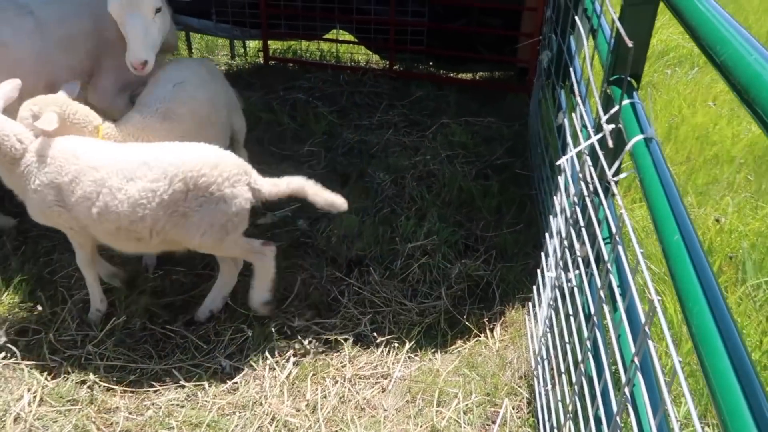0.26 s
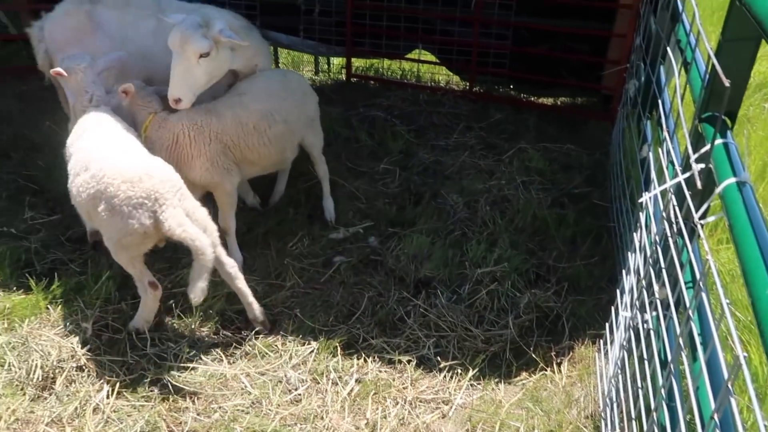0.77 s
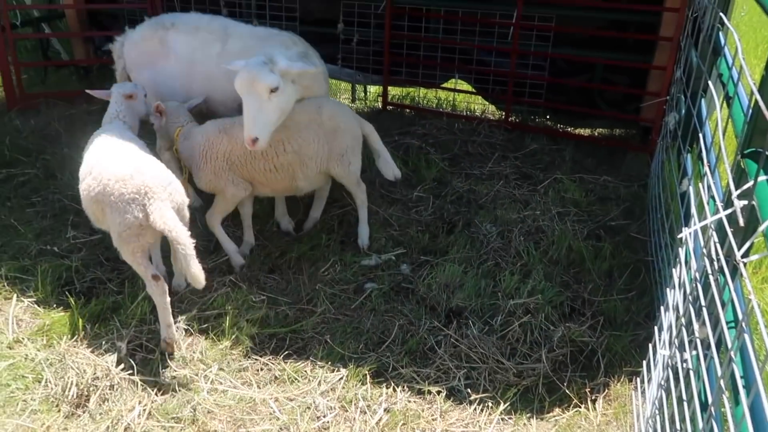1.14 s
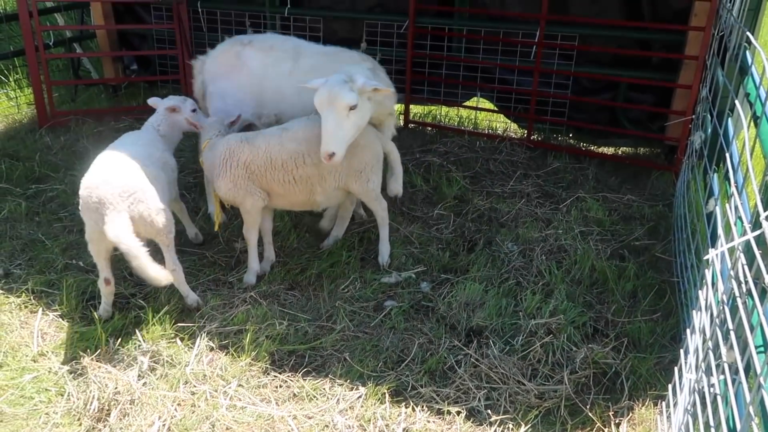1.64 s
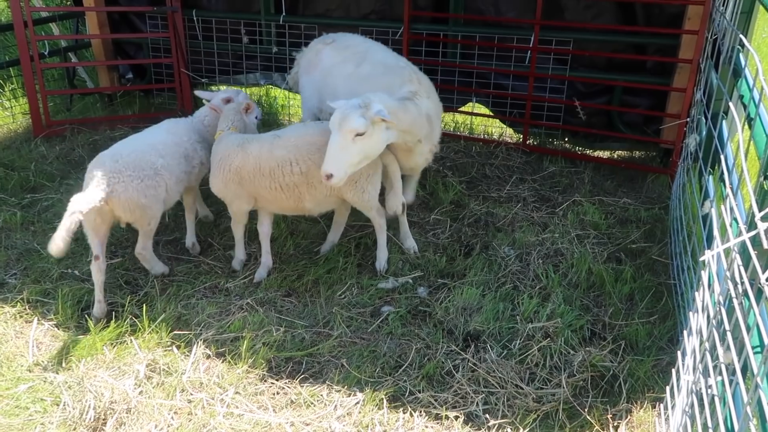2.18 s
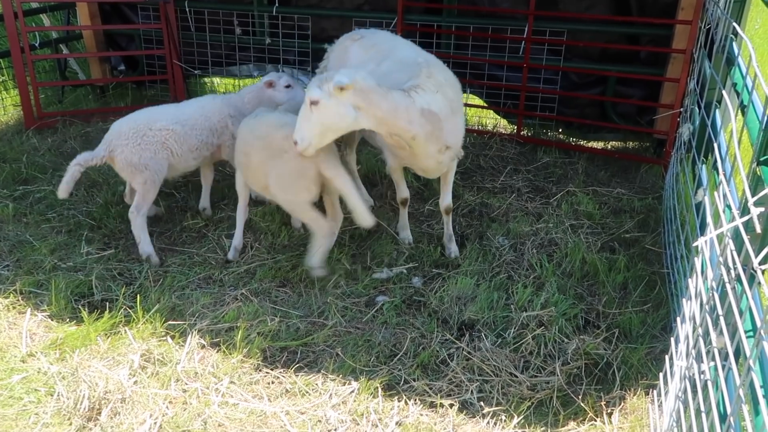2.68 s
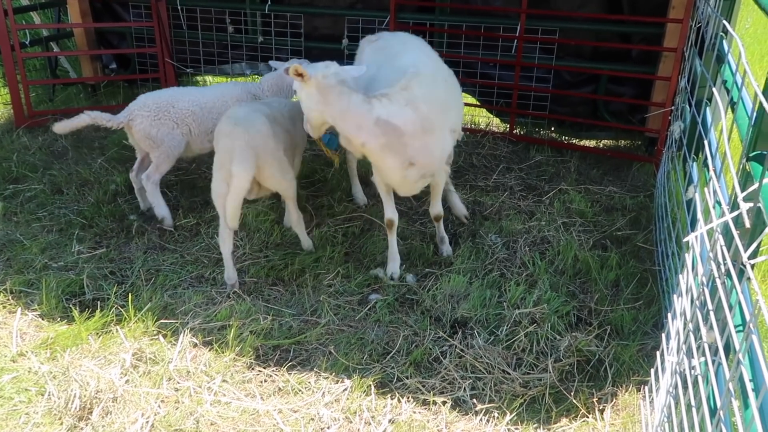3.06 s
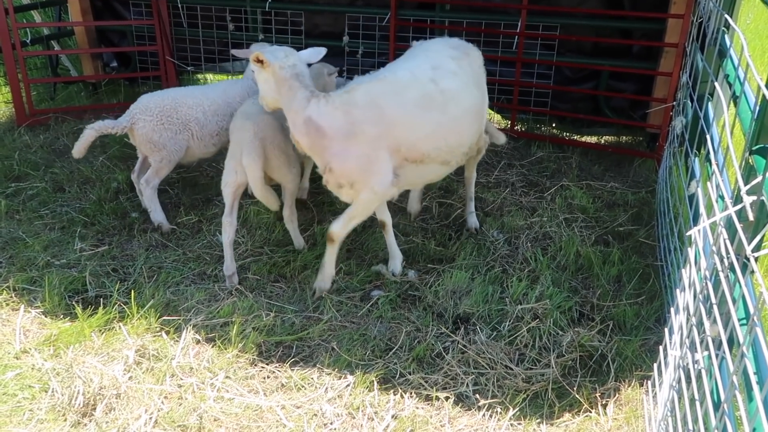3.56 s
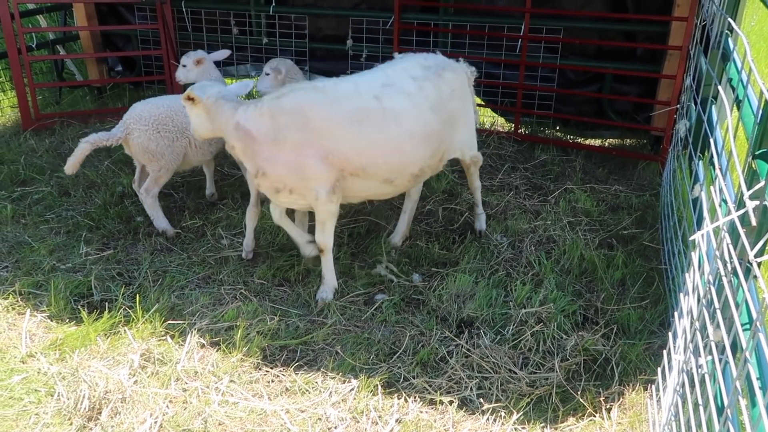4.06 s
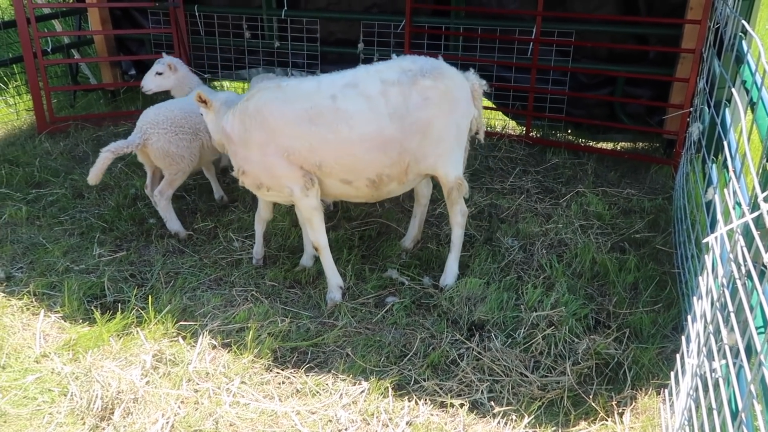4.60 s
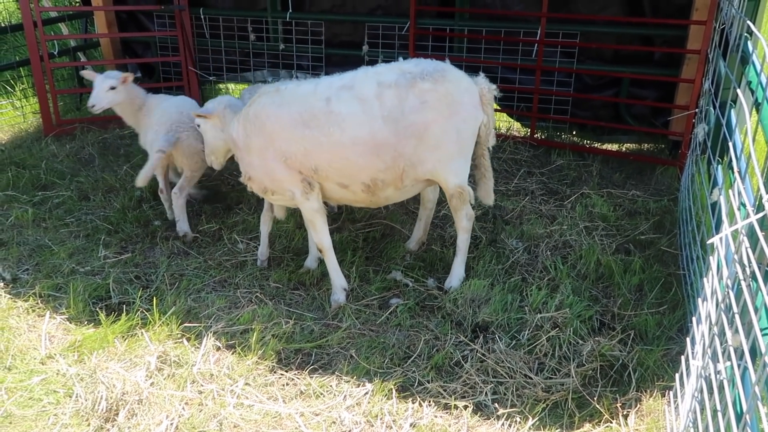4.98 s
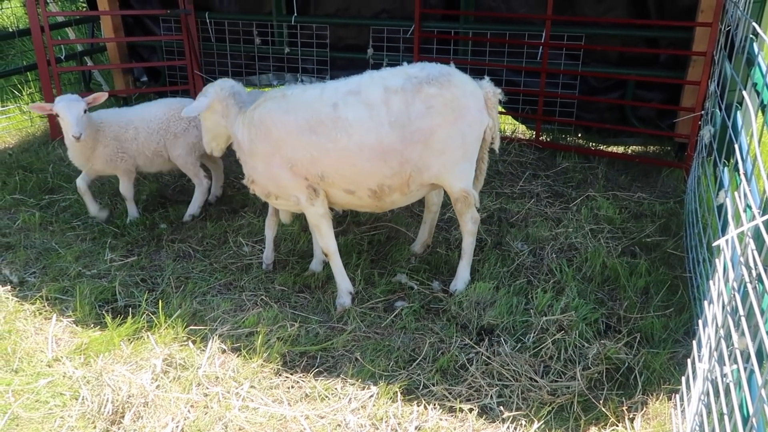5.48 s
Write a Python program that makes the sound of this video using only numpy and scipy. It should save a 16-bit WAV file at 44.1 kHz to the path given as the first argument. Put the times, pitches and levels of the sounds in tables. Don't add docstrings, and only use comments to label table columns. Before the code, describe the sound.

A quiet outdoor sheep pen, heard close in stereo, with soft air noise and a distant engine idling low. At 0 s tubes and mesh still ring faintly from an earlier blow. At about 0.4 s a loud, hard metallic clank comes with a second weaker one immediately after, each rattling, the ring fading over the next second. Straw rustles lightly; a bird whistles near 0.9 s and again around 1.8 s, where a dry stalk cracks. From 2.5 to 3.15 s a sheep bleats once: a brief closed hum, a loud open low onset, a rough break up to a higher, steadier pitch, and a harsh catch as it closes. The low background grows a little fuller around then. Muffled hoof thumps and scrapes fall at 3.9-4.15 s, followed by a rapid bird trill at 4.3-4.6 s. A sharp straw snap at 4.6 s, then bird chirps and crisp snaps from 5.15 to 5.5 s.

```python
import sys
import numpy as np
from scipy import signal
from scipy.fft import rfft, irfft, next_fast_len
from scipy.io import wavfile
from scipy.ndimage import uniform_filter1d

SR = 44100
rng = np.random.default_rng(int(sys.argv[2]) if len(sys.argv) > 2 else 0)


def rack_gain(trim_db):
    fader = np.asarray(trim_db, float)
    return 10 ** (fader / 20)


def waveform_to_disk(signal):
    frames = np.transpose(np.atleast_2d(signal))
    scaled = np.clip(frames, -1, 1) * 32767
    samples = np.round(scaled).astype(np.int16)
    wavfile.write(sys.argv[1], SR, samples)


N = 253134

# (time [s], effort [dB], pitch [Hz], mouth opening [0-1])
BLEAT = [
    (2.515, -17, 258.9, 0.26),
    (2.563, -30.5, 257, 0.24),
    (2.6, -20, 241.9, 0.95),
    (2.634, -12, 261.3, 0.95),
    (2.69, -14, 284, 0.98),
    (2.736, -18, 277.7, 1),
    (2.754, -19, 360.3, 0.86),
    (3.065, -19.5, 365.4, 1),
    (3.13, -17.5, 338, 0.81),
]
# (time [s], fall [s], recovery [s], pitch drop [Hz], extra roughness [0-1])
CATCHES = [
    (2.582, .02, .02, 22, .25),
    (2.747, .015, .03, 0, .45),
    (2.79, .024, .014, 70, .3),
    (2.818, .05, .024, 40, .1),
    (2.884, .035, .05, 20, .15),
    (2.902, .016, .024, 55, .25),
    (3.092, .02, .04, 50, .36),
]
# (time [s], length [s], level [dB])
SURGES = [(2.614, 0.023, 1.5), (2.654, 0.018, -2), (2.691, 0.012, 0), (2.722, 0.023, -1),
          (2.787, 0.012, -4), (2.804, 0.01, 2), (2.833, 0.013, -1.5), (2.892, 0.009, 2.5),
          (2.907, 0.017, -5.5), (2.921, 0.025, 3), (3.038, 0.038, -1), (3.069, .012, -2),
          (3.083, 0.017, 2.5), (3.1, 0.011, -4), (3.104, 0.0082, 0.5)]
# (time [s], level [dB])
BREATH_EBB = [(2.75, 1), (2.766, -5), (2.785, 1), (2.83, 1), (2.85, -5), (2.88, -4), (2.895, 0), (3.07, 0),
              (3.1, 2)]
# (time [s], shift [Hz])
TONGUE_SINKS = [
    (2.63, 70),
    (2.67, -25),
]
# (time [s], shift [Hz])
GAPE = [
    (2.66, 45),
    (2.7, 0),
]
# (frequency [Hz], width [Hz], level [dB])
THROAT = [(3120, 450, 1.5), (3785, 360, -13)]
# (frequency [Hz], width [Hz], level [dB])
BREATHY = [(4900, 1700, -22.5), (6110, 1500, -25), (7400, 980, -29), (11500, 12000, -53),
           (13900, 4100, -50)]
# (frequency [Hz], side over mid [dB])
VOICE_SIDE = [(60, -42), (150, -45), (380, -87), (950, -27.5), (2380, -20.5), (5980, -9.5), (15000, 5)]

# (time [s], peak [dB], rebound gap [s], loss per rebound [dB])
BLOWS = [
    (.38, -8.5, .0062, 2.8),
    (.4115, -13, .0048, 1.2),
]
# (frequency [Hz], level [dB], 60 dB decay time [s])
GATE_MODES = [(610, -14, 0.5), (1028, -1, 0.24), (1073, -12, 0.73), (1357, -8.5, 0.65), (1602, -6, 0.64),
              (1890, -24, 0.25), (2010, -18, 0.7), (2130, -13, 0.25), (2530, -13, 0.24), (2900, -19, 0.47),
              (3450, -15, 0.25), (4660, -7, 0.1), (4900, -10, 0.27), (5030, -18, 0.15), (5280, -18, 0.19),
              (5770, -13, 0.2), (7760, -16.5, 0.19)]
# (frequency [Hz], level [dB], 60 dB decay time [s])
GATE_RING = [(1553, -13, 1.6), (1578, -8, 0.68), (1550, -4, 0.6), (4050, -8.5, 0.37)]
# (frequency [Hz], level [dB], 60 dB decay time [s])
OLDER_MODES = [(353, -6, 2.9), (580, -2, 0.83), (920, -12, 4.1), (1027, -7, 3.8), (1330, -12, 0.47),
               (1450, 2, 0.75), (1540, -3, 1.3), (1572, -4, 3.6), (2120, -19, 0.85), (2540, -13.5, 1.3),
               (2830, -9, 0.21), (3110, -16, 2.8), (4080, -15, 0.94), (4500, -19, 0.87)]
# (frequency [Hz], density [dB per Hz])
MESH = [(250, -9.5), (600, -11), (1050, -3), (1550, 6.5), (2200, -4), (2900, -17), (4000, -13.5),
        (4900, -20), (6000, -22.5), (7900, -26.5), (10000, -46)]
# (frequency [Hz], density [dB per Hz])
OLDER_MESH = [(88, -44), (150, 3), (489, -4.5), (558, -12), (753, -5.5), (1540, 0.5), (2300, -12),
              (8000, -32.5), (10400, -65), (17600, -120)]
# (frequency [Hz], side over mid [dB])
GATE_SIDE = [(60, -28), (150, -35), (380, -57), (950, -20.5), (2380, -7), (5980, 2.5), (15000, 16)]

# (time [s], thump peak [dB], thump frequency [Hz], thump length [cycles], scrape [dB])
HOOVES = [(3.902, -46, 200, 0.55, -40), (3.912, -52, 200, 0.6, -41), (3.919, -45, 200, 1, -38),
          (3.935, -50, 200, 0.6, -42), (3.945, -50, 200, 0.6, -49), (3.981, -36, 159, 0.76, -34.5),
          (3.997, -34.5, 151, 0.96, -36), (4.054, -48, 161, 0.84, -37.5), (4.061, -33, 150, 0.52, -38),
          (4.069, -26, 153, 1, -37), (4.076, -35, 151, 1.6, -42), (4.083, -44, 150, 1.1, -41),
          (4.09, -36, 152, 0.68, -45), (4.145, -31, 196, 1.1, -35.5), (4.1516, -25.5, 144, 3.3, -57),
          (5.383, -36, 303, 0.56, -43)]
# (time [s], peak [dB], colour [Hz], left minus right [dB])
SNAPS = [
    (0.781, -48, 4500, 6),
    (0.9017, -44, 7250, -1),
    (4.577, -36, 7160, -1),
    (5.3675, -41, 5600, -2),
    (5.516, -41, 5090, 0),
         (2.197, -49, 2640, 0.5),
    (2.298, -43, 2100, -0.5),
    (3.7794, -59, 1810, 0.0),
    (4.1452, -36, 1900, 0.095),
    (4.467, -41, 4530, -0.54),
    (5.1497, -38, 2120, -1.0),
]
# (time [s], peak [dB], frequency [Hz], 60 dB decay time [s])
CLICKS = [
    (1.8069, -26, 2300, .007),
    (5.3672, -34, 5200, .005),
]
# (time [s], length [s], frequency [Hz], level [dB])
SHUFFLES = [
    (1.345, 0.15, 1800, -54.5),
    (1.351, 0.47, 850, -54),
    (1.547, 0.17, 1850, -52.5),
    (2.053, 0.12, 1210, -60),
    (4.558, 0.41, 1450, -58.5),
    (5.34, 0.11, 625, -50),
]
# (time [s], length [s], level [dB])
SWISHES = [(0.163, 0.051, -61), (0.248, 0.16, -57.5), (0.513, 0.12, -52.5), (0.903, 0.057, -55.5),
           (1.282, 0.075, -61), (1.71, 0.06, -62), (1.993, 0.084, -65), (2.227, .06, -68),
           (2.387, 0.08, -95), (3.416, 0.04, -61.5), (3.647, 0.21, -65.5), (3.998, 0.21, -61),
           (4.398, 0.16, -58.5), (4.54, 0.12, -60), (5.187, 0.055, -68), (5.502, 0.029, -55.5),
           (5.686, 0.035, -65)]
# (time [s], level [dB])
STIR = [(0, -60.5), (.72, -66), (1.05, -61), (1.44, -64), (2.3, -64.5), (2.9, -57), (3.5, -71),
        (4.3, -66.5), (4.85, -74.5), (5.28, -64), (5.74, -70)]
# (frequency [Hz], density [dB per Hz])
STRAW = [(600, -25.5), (1500, -10), (3000, 3), (6000, -2), (9000, -4.5), (12500, -4), (15500, -11)]

# (start [s], length [s], first pitch [Hz], last pitch [Hz], level [dB])
WHISTLES = [
    (.87, 0.16, 2420, 2540, -50.5),
    (1.012, 0.073, 2480, 2600, -59),
    (1.01, 0.09, 3630, 3280, -59),
    (1.754, 0.055, 3450, 2460, -53.5),
    (3.604, 0.035, 5680, 5540, -58),
    (3.967, 0.1, 4900, 4410, -59),
    (4.046, 0.064, 4190, 2980, -53),
    (4.28, 0.052, 2840, 2880, -55),
    (5.301, 0.026, 2427, 2700, -54.5),
    (5.327, 0.052, 2720, 2660, -52.5),
]
# (start [s], length [s], first pitch [Hz], last pitch [Hz], level [dB])
GLIDES = [
    (1.093, .12, 3300, 3390, -64),
    (1.862, 0.044, 2490, 3300, -55),
    (1.898, .028, 3350, 3200, -52),
    (1.926, 0.0355, 2770, 2440, -55),
    (5.226, 0.041, 2540, 4100, -54),
    (5.264, 0.013, 3550, 3370, -51),
    (5.368, .025, 2690, 2480, -55),
    (5.398, .045, 2620, 2680, -61),
    (5.449, .07, 3450, 2110, -54),
]
# (start [s], length [s], first pitch [Hz], top pitch [Hz], last pitch [Hz])
ARCHES = [
    (4.173, 0.12, 2200, 3690, 2820),
]
# (time [s], pitch [Hz], level [dB])
TRILL = [
    (4.295, 4500, -52),
    (4.33, 4510, -48),
    (4.47, 4620, -55),
    (4.499, 4490, -50.5),
    (4.635, 4410, -59),
]
# (frequency [Hz], side over mid [dB])
BIRD_SIDE = [(2000, -10), (5000, -1)]

# (multiple of the firing cycle, level [dB])
ENGINE_ORDERS = [(1, -39.5), (2, -16), (3, 1.5), (4, 1.5), (5, -4), (6, -11.5), (7, -10), (8, -8),
                 (9, -19.5), (10, -17), (11, -19), (12, -11), (13, -16.5), (14, -24)]
# (frequency [Hz], density [dB per Hz])
AIR = [(20, -36), (45, -36), (70, -16), (200, -13.5), (300, -11.5), (520, -15.5), (750, -16), (2800, -26.5),
       (4300, -33.5), (5500, -32.5), (10500, -50.5), (15500, -82)]
# (frequency [Hz], density [dB per Hz])
AIR_SIDE = [(59, -78), (100, -49), (223, -15.5), (457, -9.5), (519, -8), (5630, -15.5), (9950, -24.5),
            (12000, -20), (13900, -22), (15500, -56)]
# (start [s], end [s], frequency [Hz], pulse rate [per s], level [dB])
RATTLES = [
    (0.554, 2, 4000, 23, -65.5),
    (3.199, 4.604, 5680, 44, -76),
    (5.046, 5.2, 5670, 40, -70),
]

# (frequency [Hz], gain [dB])
WIND_BASS = [(110, 0), (296, -4), (800, -30)]
# (time [s], step [dB])
WIND_STEPS = [
    (2.22, 3.4),
    (2.72, 4.1),
]
# (frequency [Hz], gain [dB])
BAND_LIMITS = [(25, -17), (65, -1.0), (15560, 0.5), (15720, -75)]

CLEAR_START_S, CLEAR_END_S, CLEAR_EDGE_S = 2.94, 3.07, 0.013


def evened(x):
    return x / np.sqrt(np.mean(x ** 2) + 1e-20)


def follow(rows, t):
    return np.interp(t, *np.transpose(rows))


def read(points, hz):
    f, value = np.transpose(points)
    return np.interp(np.log(hz + 1), np.log(f + 1), value)


def add(mix, s, sound):
    part = mix[..., round(s * SR):][..., :sound.shape[-1]]
    part += sound[..., :part.shape[-1]]


def wander(size, width):
    return evened(uniform_filter1d(uniform_filter1d(rng.standard_normal(size), width), width))


def sine(hz):
    return np.sqrt(2) * np.sin(2 * np.pi * np.cumsum(hz) / SR)


def resonate(x, hz, width):
    turn = np.exp(2j * np.pi * np.cumsum(hz * np.ones(len(x))) / SR)
    r = np.exp(-np.pi * width / SR)
    return 2 * (turn * signal.lfilter([(1 - r) ** 2], [1, -2 * r, r * r], x / turn)).real


def coloured(x, points, turn=1):
    size = next_fast_len(x.shape[-1] + 4096)
    gain = rack_gain(read(points, np.fft.rfftfreq(size, 1 / SR)))
    return irfft(rfft(x, size) * turn * gain, size)[..., :x.shape[-1]]


def ports(x, side):
    s = coloured(x, side, -1j)
    return np.array([x + s, x - s])


def hiss(points):
    a, b, patches = rng.standard_normal((N // 256 + 5, 513, 3)).T
    for axis in (0, 1):
        patches = uniform_filter1d(patches, size=12, axis=axis)
    level_db = read(points, np.fft.rfftfreq(1024, 1 / SR))[:, None] + 2 * evened(patches)
    z = (a + 1j * b) * rack_gain(level_db)
    return evened(signal.istft(z, nperseg=1024, noverlap=768)[1][:N])


def shed(x, t60):
    taps = np.zeros((2, SR // 2))
    slots = np.arange(0, SR // 2 - 30, 30)
    places = slots + rng.integers(0, 30, (2, len(slots)))
    np.put_along_axis(taps, places, rng.choice([-1., 1.], places.shape), 1)
    t = np.arange(SR // 2) / SR
    taps = (taps + .8 * taps[::-1]) * rack_gain(-60 * t / t60) * (t > 0.00073)
    return signal.fftconvolve(x[None], taps / np.linalg.norm(taps[0]), axes=1)[:, :N]


def articulation(t, clear):
    s, *columns = np.transpose(BLEAT)
    effort_db, hz, wide = (np.interp(t, s, c) for c in columns)
    onset_s, edge_db_per_s = 0.03, 779
    outside_s = np.maximum(t - s[-1], 0) + np.maximum(s[0] + onset_s - t, 0)
    effort_db = effort_db - edge_db_per_s * outside_s

    lips = np.interp(wide, [0, .32, .42, .8, 1], [0, 0, .8, .8, 1])
    mouth = np.interp(lips, [0, 1], [275, 898]) - 36 * clear
    tongue = np.interp(wide, [0, 1], [2350, 2185]) - 9 * clear
    bright_db = np.interp(wide, [0, 1], [-20, 1]) + 4.5 * clear
    tongue = tongue + wide * follow(TONGUE_SINKS, t)
    mouth = mouth + lips * follow(GAPE, t)
    mouth = mouth - 69 * clear * (t > 3) * np.minimum((t - 3) / CLEAR_EDGE_S, 1)

    rough_shut, rough_low, rough_high, rough_clear = .12, .33, .28, .11
    rough = rough_shut + wide * (np.interp(hz, [290, 350], [rough_low, rough_high]) - rough_shut)
    rough = rough + clear * (rough_clear - rough)
    hz = hz - 6 * clear * np.sin(np.pi * (t - CLEAR_START_S) / (CLEAR_END_S - CLEAR_START_S)) ** 2

    root_db = 9 * np.clip((t - s[-1]) / .015 + .5, 0, 1)
    chest = np.zeros(len(t))
    for at, fall, recovery, drop_hz, harsher in CATCHES:
        catch = np.interp(t, [at - fall, at, at + recovery], [0, 1, 0])
        hz = hz - drop_hz * catch
        rough = rough + harsher * catch
        effort_db = effort_db + 1.6 * wide * catch
        root_db = root_db - 8 * catch * min(drop_hz / 50, 1)
        mouth = mouth + 50 * catch
        chest = chest + np.cbrt(catch) * (drop_hz > 30)
    for at, length, db in SURGES:
        effort_db = effort_db + db * np.exp(-(2 * (t - at) / length) ** 2)
    chest, rough = np.minimum(chest, 1), np.clip(rough, 0, .8)
    return effort_db, hz, wide, mouth, tongue, bright_db, rough, root_db, chest


def vocal_folds(t, hz, rough, jitter, shimmer, waver):
    uneven = .012 * np.minimum(t - t[0], .4) * waver + .16 * rough ** 2 * jitter
    turns = np.cumsum(hz * (1 + uneven)) / SR
    closing = turns + .035 * rough * shimmer
    partial_s = .016
    knots = np.arange(t[0], t[-1] + partial_s, partial_s)
    own = [rack_gain(np.interp(k, [1, 14], [1.2, 3.6]) * np.interp(t, knots, n))
           for k, n in enumerate(rng.standard_normal((42, len(knots))))]
    flow = evened(sum(own[k] * np.cos(2 * np.pi * k * turns) for k in range(1, 8)))
    folds = evened(sum(own[k] * np.cos(2 * np.pi * k * (closing + .004 * k)) for k in range(1, 42)))
    puffs = evened((.3 + np.exp(-(turns % 1) / .3)) * rng.standard_normal(len(t)))
    return flow * rack_gain(4 * rough * shimmer), folds * rack_gain(3 * rough * shimmer), puffs


def upper_tract(t, folds, puffs, hz, mouth, tongue, rough, clear, jitter, shimmer, waver, drift, flicker):
    high = np.sqrt(1 - rough) * folds + .7 * rough * puffs
    opening = np.clip((mouth - 280) / 600, 0, 1) + .05 * drift
    tongue_hz = tongue * (1 + .006 * (1 - .8 * clear) * drift)
    upper = -flicker[2] ** 2 * resonate(high, tongue_hz, 250)
    for k, (f, width, db) in enumerate(THROAT):
        level_db = db - 5.5 * (1 + .7 * k) * clear + 2 * np.roll(waver, 3000 * k)
        formant = resonate(high, f * (0.944 + 0.068 * opening), width)
        upper += (-1) ** k * flicker[k] * rack_gain(level_db) * formant
    breath = (.15 + 1.6 * np.minimum(rough, .4)) * (1 - .6 * clear) * puffs
    for f, width, db in BREATHY:
        lag = round(f)
        level_db = db - 2.5 * clear + follow(BREATH_EBB, t) + 1.5 * shimmer
        driven = .55 * folds + breath * rack_gain(1.5 * jitter + 1.2 * np.roll(drift, lag))
        upper += rack_gain(level_db) * resonate(driven, f * (1 + .05 * np.roll(waver, lag)), width)
    valley = np.interp(hz, [290, 350], [.28, 1]) * resonate(folds, 1730, 520)
    upper += rack_gain(-8.5 + 1.6 * drift) * valley
    upper += rack_gain(-5 - 20.0 * clear) * shed(upper, t60=.05)[0, :len(t)]
    return upper


def bleat():
    start_s, end_s = BLEAT[0][0], BLEAT[-1][0]
    t = np.arange(start_s, end_s + .04, 1 / SR)
    clear = np.clip(np.minimum(t - CLEAR_START_S, CLEAR_END_S - t) / CLEAR_EDGE_S + .5, 0, 1)
    effort_db, hz, wide, mouth, tongue, bright_db, rough, root_db, chest = articulation(t, clear)
    jitter, shimmer = (wander(len(t), 130) for _ in range(2))
    waver, drift = (wander(len(t), 900) for _ in range(2))
    flicker = [rack_gain(1.4 * (1 - .7 * clear) * wander(len(t), 350)) for _ in range(4)]
    flow, folds, puffs = vocal_folds(t, hz, rough, jitter, shimmer, waver)
    upper = upper_tract(t, folds, puffs, hz, mouth, tongue, rough, clear,
                        jitter, shimmer, waver, drift, flicker)

    chest_tone = rack_gain(-1.5) * chest * resonate(flow, 640, 130)
    mouth_tone = np.sqrt(flicker[3]) * resonate(resonate(flow, mouth, 450), mouth, 450)
    mouth_tone = rack_gain(-9 * (1 - wide)) * mouth_tone
    root = rack_gain(-14.0 + root_db) * resonate(flow, hz, 100)
    brightening = np.minimum((t - t[0]) / .035, 1) ** 2
    voice = rack_gain(-6.5) * (chest_tone + mouth_tone + root) + rack_gain(bright_db) * brightening * upper
    nose = .75 * clear * np.clip((t - 2.972) / CLEAR_EDGE_S + .5, 0, 1) * flicker[3]
    voice = voice - nose * resonate(voice, 1080, 300)

    power = uniform_filter1d(voice ** 2, 2000)
    out = np.zeros(N)
    add(out, start_s, rack_gain(effort_db) * voice / np.sqrt(power + 1e-12))
    return ports(out, VOICE_SIDE) + rack_gain(-20) * shed(out, t60=.42)


def gate():
    t, out = np.arange(round(1.6 * SR)) / SR, np.zeros(N)
    rebounds, tube_db, glancing_db = 4, -8, -3
    knocks = []
    for s, db, gap, loss_db in BLOWS:
        for k in range(rebounds):
            knock_db = db - k * loss_db
            knocks.append((s + k * gap, knock_db, knock_db + tube_db + glancing_db * (k > 0)))
    for s, db, _ in knocks:
        mesh = evened(coloured(rng.standard_normal(len(t)), MESH))
        decay = rack_gain(-11.5 - 60 * t / 0.061) + rack_gain(-24 - 60 * t / 0.23) + rack_gain(-30.5 - 60 * t / 0.9)
        add(out, s, rack_gain(db) * mesh * decay)
    for hz, db, t60 in GATE_MODES + GATE_RING:
        energy = sum(rack_gain(2 * (s_db + ring_db - 60 * (t - s) / t60)) * (t > s)
                     for s, s_db, ring_db in knocks)
        ring = evened(resonate(rng.standard_normal(len(t)), hz, max(40, hz / 32)))
        if t60 > .7:
            ring = evened(np.sin(2 * np.pi * hz * t) + .15 * ring)
        out[:len(t)] += rack_gain(db - 1.5) * np.sqrt(energy) * ring
    return ports(out, GATE_SIDE)


def older_blow():
    t, out = np.arange(round(1.6 * SR)) / SR, np.zeros(N)
    tubes = sum(rack_gain(db - 60 * t / t60) * np.sin(2 * np.pi * (hz * t + rng.random()))
                for hz, db, t60 in OLDER_MODES + GATE_RING)
    mesh = evened(coloured(rng.standard_normal(len(t)), OLDER_MESH))
    add(out, 0, rack_gain(-41.0) * tubes + mesh * rack_gain(-36.5 - 60 * t / 1.75))
    return ports(out, GATE_SIDE)


def hooves():
    out, t = np.zeros((2, N)), np.arange(3000) / SR
    for s, db, hz, cycles, scrape_db in HOOVES:
        fade = np.cos(np.pi / 2 * np.minimum(t * hz / (cycles + 0.44), 1))
        thump = np.sin(2 * np.pi * hz * t) * fade
        noise = rng.standard_normal(len(t))
        grit = evened(resonate(noise, 720, 520) + .45 * resonate(noise, 1550, 480))
        grit = grit * rack_gain(-60 * t / .045) * np.minimum(t / .0015, 1)
        add(out, s, rack_gain(db) * thump + rack_gain(scrape_db) * grit)
    return out


def stalks():
    out, t = np.zeros((2, N)), np.arange(3000) / SR
    for s, db, hz, pan_db in SNAPS:
        noise = rng.standard_normal((2, len(t)))
        snap = np.array([evened(resonate(n + .8 * noise[0], hz, .9 * hz)) for n in noise])
        pan = rack_gain(np.array([[pan_db], [-pan_db]]) / 2)
        add(out, s, rack_gain(db - 2) * snap * rack_gain(-60 * t / .014) * pan)
    for s, db, hz, t60 in CLICKS:
        add(out, s, -rack_gain(db - 60 * t / t60) * np.sin(2 * np.pi * hz * t))
    return out


def rustle():
    out = np.zeros((2, N))
    for s, length, hz, db in SHUFFLES:
        noise = rng.standard_normal(round(length * SR))
        add(out, s, rack_gain(db) * evened(resonate(noise, hz, 0.43 * hz)) * np.hanning(len(noise)))
    contact = rng.random(N) < 900 / SR
    strength = rack_gain(4.0 * np.minimum(rng.exponential(1, N), 2.6))
    grains = rng.standard_normal((2, N)) * (.5 + strength * contact)
    level = rack_gain(follow(STIR, np.arange(N) / SR) + 4.5)
    for s, length, db in SWISHES:
        add(level, s, rack_gain(db) * np.hanning(round(length * SR)))
    mid, side = evened(coloured(grains, STRAW)) * level
    return out + np.array([mid + 0.84 * side, mid - 0.87 * side])


def whistles():
    steady, glides, notes = np.zeros(N), np.zeros(N), []
    for start, length, first, last, db in WHISTLES:
        u = np.linspace(0, 1, round(length * SR))
        notes.append((start, last + (first - last) * (1 - u) ** 2, db - 2 * u))
    for start, length, first, last, db in GLIDES:
        notes.append((start, np.linspace(first, last, round(length * SR)), db))
    for start, length, *corners in ARCHES:
        u = np.linspace(0, 1, round(length * SR))
        notes.append((start, uniform_filter1d(np.interp(u, [0, .58, 1], corners), size=600), -55))
    for start, hz, db in notes:
        flutter = 1.5 * wander(len(hz), 130)
        flutter_db = flutter - 3
        quick = np.ptp(hz) > 250
        if quick:
            hz = hz + 25 * np.roll(flutter, 500)
            flutter_db = flutter_db * 1.4
        level = rack_gain(db + 3.7 * quick + flutter_db) * signal.windows.tukey(len(hz), .25)
        add(glides if quick else steady, start, level * sine(hz))
    direct = ports(steady + glides, BIRD_SIDE)
    return direct + rack_gain(-2) * shed(glides, t60=.3) + rack_gain(-6) * shed(steady, t60=.5)


def trill():
    notes_per_s, sweep_hz = 55.6, 400
    s, hz, db = np.transpose(TRILL)
    t = np.arange(s[0], s[-1], 1 / SR)
    beat = (t - s[0]) * notes_per_s % 1
    pitch = np.interp(t, s, hz) + sweep_hz * (.3 - beat)
    level = rack_gain(np.interp(t, s, db)) * np.sin(np.pi * np.minimum(beat / 0.77, 1)) ** 2
    out = np.zeros(N)
    add(out, s[0], level * sine(pitch))
    return ports(out, BIRD_SIDE) + rack_gain(-6) * shed(out, t60=.5)


def rattles():
    side = np.zeros(N)
    for start, end, hz, per_s, db in RATTLES:
        t = np.arange(0, end - start, 1 / SR)
        pulses = rng.standard_normal(len(t)) * rack_gain(-45 * (t * per_s % 1))
        fade = signal.windows.tukey(len(t), .3)
        add(side, start, rack_gain(db) * evened(resonate(pulses, hz, 600)) * fade)
    return np.array([side, -side])


def engine():
    firing_hz, pipe_spread = 24.32, .35
    turns, out = firing_hz * np.arange(N) / SR, np.zeros(N)
    knots = np.linspace(0, N, 30)
    for k, db in ENGINE_ORDERS:
        level, lag = (np.interp(np.arange(N), knots, n) for n in rng.standard_normal((2, 30)))
        phase = k * turns + pipe_spread * k * k + 0.0096 * k * lag
        out += rack_gain(db + 1.95 * level) * np.cos(2 * np.pi * phase)
    out = np.sqrt(2) * rack_gain(-46.5) * out
    return np.array([out, out])


def open_air():
    knots = np.linspace(0, N, 14)
    swell = rack_gain(1 + .5 * np.interp(np.arange(N), knots, rng.standard_normal(14)))
    mid = rack_gain(-50.5) * swell * hiss(AIR)
    side = rack_gain(-58.5) * swell * hiss(AIR_SIDE)
    return np.array([mid + side, mid - side])


def scene():
    animals = bleat() + gate() + older_blow() + hooves() + stalks() + rustle()
    return animals + whistles() + trill() + rattles() + engine() + open_air()


def roll_off(x):
    return signal.sosfilt(signal.butter(12, 15710, fs=SR, output="sos"), x)


def record(dry):
    t = np.arange(N) / SR
    bass = coloured(dry, WIND_BASS)
    passed_db = -12 + 0.89 * t
    for s, db in WIND_STEPS:
        passed_db = passed_db + db * np.clip((t - s) / .02 + .5, 0, 1)
    mix = coloured(dry - (1 - rack_gain(passed_db)) * bass, BAND_LIMITS)
    return roll_off(mix)


dry = scene()
out = record(dry)
waveform_to_disk(out)
```